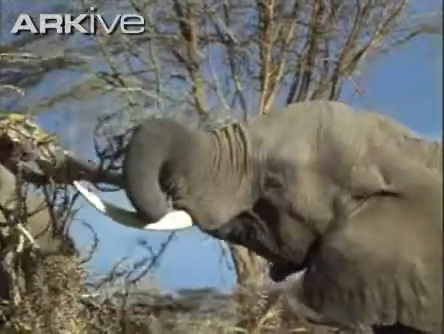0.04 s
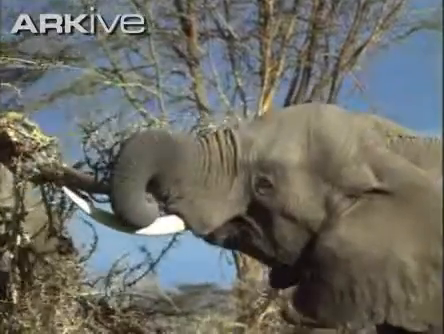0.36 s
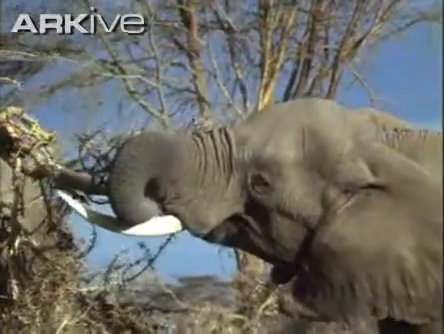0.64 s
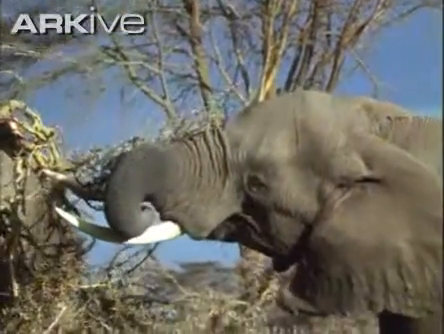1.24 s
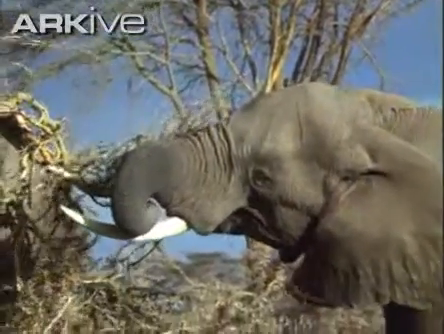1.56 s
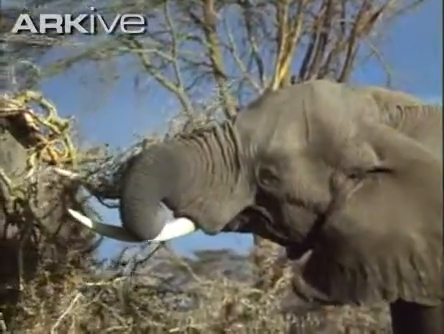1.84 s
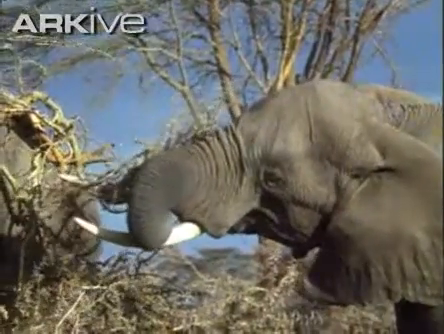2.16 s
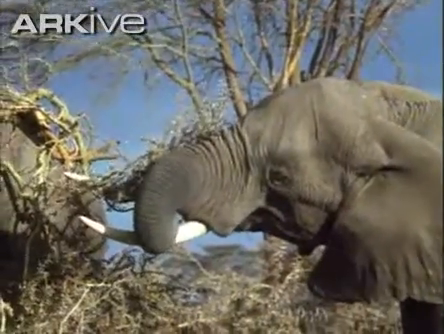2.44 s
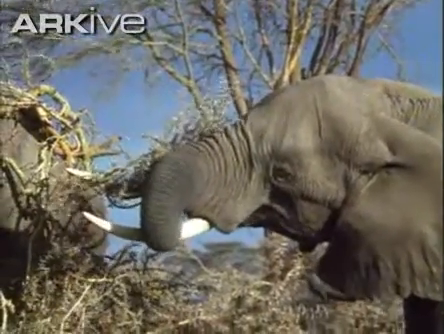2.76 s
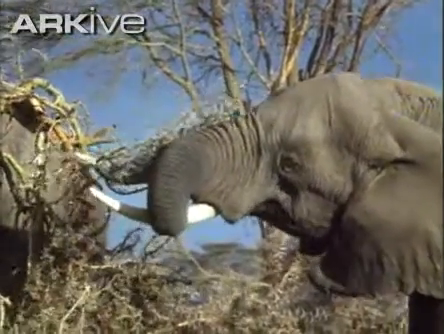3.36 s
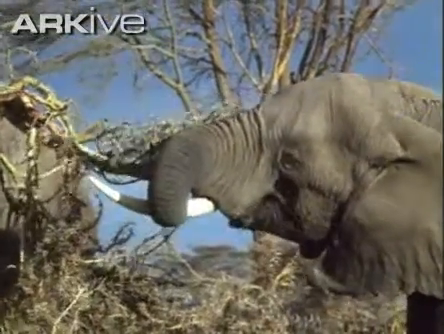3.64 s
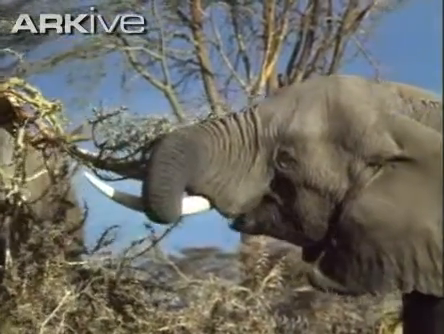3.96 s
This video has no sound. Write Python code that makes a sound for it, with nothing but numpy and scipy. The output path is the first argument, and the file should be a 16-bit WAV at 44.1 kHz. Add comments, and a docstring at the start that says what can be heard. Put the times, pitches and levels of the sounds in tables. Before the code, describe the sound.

Dry branches snapping and rustling as an elephant pulls at a tree, with bird trills.

```python
"""Open bush, a stereo microphone facing a dry thorn tree that an elephant is pulling at. From the start the
foliage rustles, limbs knock, green wood splinters and twigs snap, loudest just before one second. Then a
small bird off to the left gives the first of four trills, scattered by the trees, and a gust rumbles on
the microphone as more twigs go. A thick limb gives way at 2.3 s; a few last snaps follow. Far away, other
birds or insects chirr on and off and the air hums steadily to the end."""
import sys
import numpy as np
from scipy import signal
from scipy.fft import rfft, irfft, next_fast_len
from scipy.io import wavfile
from scipy.ndimage import map_coordinates

SR = 44100
rng = np.random.default_rng(int(sys.argv[2]) if len(sys.argv) > 2 else 0)


def to_wav(s):
    """Save 16-bit WAV."""
    ch = np.atleast_2d(s).T  # columns
    pcm = np.round(np.clip(ch, -1, 1) * 32767)  # PCM
    wavfile.write(sys.argv[1], SR, pcm.astype(np.int16))


N = 4 * SR


def amp(db):
    """Decibels to gain."""
    return 10 ** (np.asarray(db) / 20)


def unit(x):
    """Scale to rms 1."""
    return x / np.sqrt(np.mean(x ** 2) + 1e-20)


def along(points, hz):
    """Read (Hz, value) points on a log axis."""
    freqs, values = np.transpose(points)
    return np.interp(np.log(hz + 1), np.log(freqs + 1), values)


def curve(rows):
    """Read (seconds, value) points at every sample."""
    return np.interp(np.arange(N) / SR, *np.transpose(rows))


def wobble(rate):
    """A smooth random curve, rate knots a second."""
    knots = rng.standard_normal(int(N * rate / SR) + 4)
    return map_coordinates(knots, [np.arange(N) * rate / SR])


def filtered(x, response):
    """Multiply the spectrum of x by a response of frequency."""
    n = x.shape[-1]
    padded = next_fast_len(n + 8192)
    return irfft(rfft(x, padded) * response(np.fft.rfftfreq(padded, 1 / SR)), padded)[..., :n]


def resonate(x, hz, width):
    """One resonance; width is a share of its frequency."""
    return filtered(x, lambda f: 1j * f * hz * width / (hz * hz - f * f + 1j * f * hz * width))


def add(track, start, sound):
    """Mix a sound into the track, start in seconds."""
    i = max(round(start * SR), 0)
    track[i:i + len(sound)] += sound[:max(N - i, 0)]


def pan(left_db):
    """Gains of the two channels, the left louder by left_db."""
    return amp(np.array([[1], [-1]]) * left_db / 2)


def spread(pair, spectrum, coherence):
    """Colour two unrelated signals and blend them into stereo of rms 1."""
    def mid_side_gains(f):
        angle = np.arccos(np.clip(along(coherence, f), -1, 1)) / 2
        return amp(along(spectrum, f)) * [np.cos(angle), np.sin(angle)]
    mid, side = filtered(pair, mid_side_gains)
    return unit(np.array([mid + side, mid - side]))


def fibres(shape, rate, scatter_db):
    """Tiny fractures of uneven size at random moments, about rate a second, rms 1."""
    size = amp(scatter_db * np.minimum(rng.standard_exponential(shape), 5))
    breaks = rng.random(shape) < rate / SR
    return unit(breaks * np.sign(rng.standard_normal(shape)) * size)


# Twigs breaking straight ahead. Each row: start in seconds, relative level in dB, ring pitch in Hz,
# relative ring level in dB, ring t60 in seconds, crackle t60 in seconds, woody body boost in dB.
TWIG_SNAPS = [(0.034, -25, 5800, 0, .003, 0.009, 2), (0.303, -33.5, 5600, 14, .003, 0.0066, 0),
              (0.401, -27, 5040, 3.5, 0.0028, 0.01, 0), (0.6335, -22.5, 4730, -2, 0.0034, 0.006, -2),
              (0.6406, -24, 2600, 3, .003, 0.0099, -4), (0.6885, -15.5, 5760, 7, .003, 0.013, 1),
              (0.7456, -10, 5860, -0.5, 0.0027, 0.012, -1.5), (0.7867, -27.5, 2200, 0, .006, 0.0099, -5),
              (0.796, -24, 3100, -1, .003, 0.005, 4), (0.803, -26, 5600, 3, .003, 0.0081, 0),
              (0.812, -28.5, 4200, 4, .003, 0.009, -6), (0.8877, -21.5, 4930, -5, .003, 0.015, 3),
              (0.9507, -29, 5530, 9, .003, 0.009, 0), (1.012, -17.5, 3730, 10, .0019, 0.0053, -1),
              (1.419, -38, 3860, 22, .04, 0.012, -1), (1.5383, -26.5, 4620, 10, .003, 0.011, -1),
              (1.5476, -15.5, 5630, 4, .003, 0.009, 2), (1.5578, -16.5, 5600, 6, 0.0023, 0.0089, -4),
              (1.571, -27, 2030, -4, 0.0033, 0.009, 0), (1.5777, -28, 4750, -1, .003, 0.009, 0),
              (1.6051, -15.5, 5430, 1.5, 0.0032, 0.0087, 1), (1.633, -29.5, 2530, 7, .005, 0.011, 4),
              (1.6436, -16, 2400, -3, 0.0025, 0.013, -4.5), (2.132, -35, 2100, 16, .025, 0.012, 0),
              (2.974, -24.5, 7360, -1, .003, 0.009, 6), (2.9924, -16.5, 3590, 13.5, 0.011, 0.0067, 6.5),
              (3.4882, -31.5, 6060, 12, .003, 0.008, 0), (3.8399, -31.5, 5730, -5, .003, 0.0061, -3),
              (3.8565, -14, 5100, 9.5, 0.0034, 0.005, 2), (3.871, -30, 4400, 1, .003, 0.009, 2),
              (3.9705, -26, 1900, 10.5, .004, 0.018, -2)]
# The break crossing a twig. Each row: nominal delay in seconds, signed share of the impulse.
FRACTURE_STEPS = [(0, 0.28), (.0004, -0.44), (.0009, 0.2)]
# The colour of a dry crack. Each row: frequency in Hz, gain in dB.
CRACK_SPECTRUM = [(100, -31), (600, -1), (1100, -1.5), (1700, 4.5), (3500, 4.5), (5500, 4.5), (7500, 3)]
# Where a thicker twig adds body. Each row: frequency in Hz, share of the boost.
BODY_SHARE = [(900, 0.93), (1700, 0.63), (2800, 0)]

def twig_snaps():
    """A twig parts in a few quick steps, rings and sheds a crackle of fibres, then shivers."""
    out, t = np.zeros(N), np.arange(SR // 8) / SR
    shiver = amp(-22 - 60 * t / 0.055)
    for start, db, hz, ring_db, ring_t60, crackle_t60, body_db in TWIG_SNAPS:
        crackle = amp(-15 - 60 * (t / crackle_t60) ** 2)
        crack = fibres(len(t), rate=20000, scatter_db=2) * (crackle + shiver)
        pace = rng.uniform(0.6, 1.3)
        for delay, share in FRACTURE_STEPS:
            crack[round(delay * pace * SR)] = amp(10.5) * share
        crack = np.pad(crack, (SR // 1000, 0))  # room for the filter to ring ahead of the break
        wood = filtered(crack, lambda f: amp(along(CRACK_SPECTRUM, f) + body_db * along(BODY_SHARE, f)))
        ring = resonate(crack, hz, width=np.log(1000) / (np.pi * ring_t60 * hz))
        add(out, start + 0.00026, amp(db - 1.5) * (wood + amp(ring_db + 2.5) * ring))
    return out


# Green wood tearing, ahead and to the left. Each row: start in seconds, relative level in dB,
# centre in Hz, left over right in dB, seconds to fall by 12 dB.
SPLINTERS = [(0.155, -35, 1780, 3.5, 0.02), (0.524, -32, 4700, 2, 0.013), (0.7874, -27.5, 2040, 1, 0.029),
             (0.934, -32.5, 2570, 5.5, 0.012), (1.0072, -26, 3400, -0.5, 0.012),
             (1.0644, -37.5, 3720, 15.5, 0.04), (1.1137, -33.5, 2120, 15.5, 0.013),
             (2.0635, -30.5, 4300, -2, 0.012), (2.664, -32.5, 2300, 3, 0.016),
             (3.9804, -30.5, 2530, -1, 0.021)]

def splintering():
    """Tougher wood tears in a short run of fractures that dies away."""
    out, t = np.zeros((2, N)), np.arange(SR // 4) / SR
    attack = 1 - np.exp(-t / 0.00053)
    for start, db, hz, left_db, fall_s in SPLINTERS:
        tear = unit(resonate(fibres(len(t), rate=4000, scatter_db=2.5), hz, width=0.34))
        envelope = attack * amp(db - 9 - 12 * t / fall_s)
        for channel, gain in zip(out, pan(left_db)):
            add(channel, start, gain * envelope * tear)
    return out


# The hollow notes of a thick limb, dead ahead. Each row: pitch in Hz, level in dB, t60 in seconds.
THUMP_MODES = [(354, -27.5, 0.064), (420, -24.5, 0.041), (500, -28, 0.047)]
# The colour of its tearing fibres. Each row: frequency in Hz, gain in dB.
TEAR_SPECTRUM = [(300, -13), (900, -19), (1400, -7), (2150, 2.5), (2850, 1), (3500, -7), (4200, 3),
                 (5200, -2), (7500, -7.5)]

def limb_break():
    """A thick limb gives way: a dull crack, a hollow thump, then its fibres tear and peel apart."""
    out, t = np.zeros(N), np.arange(SR // 4) / SR
    start = 2.301
    crack_t60, tear_t60, peel_t60 = 0.037, 0.042, 0.25  # seconds
    crack = unit(resonate(fibres(len(t), rate=13000, scatter_db=2.5), hz=1090, width=1.8))
    add(out, start, amp(-31 - 60 * t / crack_t60) * crack)
    thump = sum(amp(db - 60 * t / t60) * np.sin(2 * np.pi * hz * t) for hz, db, t60 in THUMP_MODES)
    add(out, start + 0.0029, (1 - np.exp(-t / 0.0028)) * thump)
    fractures = fibres(len(t), rate=11000, scatter_db=2)
    tear = unit(filtered(fractures, lambda f: amp(along(TEAR_SPECTRUM, f))))
    fade = amp(-30 - 60 * t / tear_t60) + amp(-37 - 60 * t / peel_t60)
    add(out, start + 0.008, fade * tear)
    return out


# Limbs meeting inside the tree. Each row: start in seconds, relative level in dB, pitch in Hz,
# t60 in seconds.
LIMB_KNOCKS = [(0.152, -39, 468, 0.11), (0.74, -38, 268, 0.09), (0.933, -33.5, 290, 0.079),
               (1.488, -35.5, 743, 0.067), (1.924, -33, 300, 0.022), (1.93, -31, 155, 0.048),
               (2.01, -33, 467, 0.037), (2.211, -40, 520, 0.056), (2.712, -35, 1160, 0.042),
               (3.942, -33, 726, 0.029), (3.986, -32, 528, 0.044)]

def limb_knocks():
    """Limbs bump and judder: a damped low note under a rough wooden scuff."""
    out, t = np.zeros(N), np.arange(SR // 4) / SR
    attack = 1 - np.exp(-t / 0.003)
    for start, db, hz, t60 in LIMB_KNOCKS:
        scuff = unit(resonate(fibres(len(t), rate=3800, scatter_db=-0.5), hz, width=0.93))
        bark = unit(resonate(fibres(len(t), rate=3000, scatter_db=-3.5), hz=750, width=1.2))
        body = 0.65 * np.sin(2 * np.pi * hz * t) + 0.51 * scuff + 0.23 * bark
        add(out, start + 0.0014, amp(db + 4 - 60 * t / t60) * attack * body)
    return out


# How hard the foliage is dragged. Each row: time in seconds, relative level in dB.
DRAG_LEVEL = [(0, -45.5), (.16, -43.5), (.47, -47.5), (.62, -45), (.82, -40.5), (.95, -43), (1.1, -44),
              (1.16, -50.5), (1.25, -40.5), (1.33, -48), (1.45, -50.5), (1.5, -47), (1.57, -46.5),
              (1.7, -47.5), (2.1, -45), (2.28, -41), (2.47, -41), (2.77, -46.5), (2.93, -47), (3.06, -45.5),
              (3.25, -52), (3.45, -53), (3.7, -49), (3.9, -51.5), (4, -47.5)]
# The colour of dry leaves. Each row: frequency in Hz, gain in dB.
LEAF_SPECTRUM = [(150, -10), (400, -14.5), (800, -2), (1200, -8), (2000, -4.5), (3200, -4.5), (5000, -2.5),
                 (6500, -5), (7500, -4.5)]
# The leaves sit near the centre. Each row: frequency in Hz, left-right coherence.
LEAF_COHERENCE = [(200, 0.96), (1000, 0.54), (2000, 1), (7000, 0.97)]
# Twigs rubbing together. Each row: resonance in Hz, level against the leaves in dB.
TWIG_SCRAPES = [(720, -19), (1950, -11), (3700, -13), (4900, -21.5)]

def foliage_rustle():
    """Dry leaves and thorns brush past each other: dense hiss, sparser ticks and fits of scraping."""
    hiss = fibres((2, N), rate=12000, scatter_db=2.5)
    ticks = amp(-12) * fibres((2, N), rate=350, scatter_db=5.5)
    flutter = amp(2.6 * np.tanh(wobble(32.02)))
    leaves = flutter * spread(hiss + ticks, LEAF_SPECTRUM, LEAF_COHERENCE)
    scrapes = np.zeros(N)
    for hz, db in TWIG_SCRAPES:
        fits = amp(2.3 * wobble(28.17))
        rubbing = resonate(fibres(N, rate=3000, scatter_db=2), hz, width=0.39)
        scrapes += amp(db) * unit(fits * rubbing)
    return amp(curve(DRAG_LEVEL) + 3) * (leaves + scrapes)


def echoes(x, t60):
    """Vegetation scatters a sound into a diffuse stereo tail, each band dying at its own rate."""
    hz, t, noise = signal.stft(rng.standard_normal((2, SR // 2)), SR, nperseg=256)
    decay = amp(-60 * t / along(t60, hz)[:, None])
    tail = signal.istft(noise * decay, SR, nperseg=256)[1]
    return signal.fftconvolve(x[None], tail / np.linalg.norm(tail[0]), axes=1)[:, :N]


# The short decay of the bush around the tree. Each row: frequency in Hz, t60 in seconds.
BUSH_DECAY = [(200, 0.19), (2000, .13), (7000, 0.035)]

def bush_scatter(wood):
    """The bush throws a faint echo of the breaking wood back to the microphone."""
    return amp(-27) * echoes(wood.mean(axis=0), BUSH_DECAY)


# A small bird left of the microphone. Each row: start in seconds, relative level in dB, time stretch,
# loss behind bushes on the direct path in dB.
BIRD_TRILLS = [(1.119, -31.5, 1.02, 0.5), (1.916, -33, 1.03, 22), (2.325, -32.5, 1.03, -0.5),
               (3.4081, -34, 0.99, -1)]
# Its song lingering among the trees. Each row: frequency in Hz, t60 in seconds.
TREE_DECAY = [(2000, .6), (7000, 0.48)]

def bird_trills():
    """Each trill is a run of steep downward chirps that swells, slows to a steady beat and eases off."""
    chirp_s, top_hz, end_hz = 0.014, 6483, 4990
    swell_s, fade_s, left_lead_s = 0.036, 0.017, 38e-6
    song, direct = np.zeros(N), np.zeros(N)
    progress = np.arange(int(chirp_s * SR)) / SR / chirp_s
    envelope = np.interp(progress, [0, 0.25, 0.55, 1], [0, 0.79, 0.5, 0.071])
    phase = 2 * np.pi * np.cumsum(top_hz + (end_hz - top_hz) * progress) / SR
    gaps = np.minimum(0.0143 + 0.00105 * np.arange(13), 0.0212)
    for start, db, stretch, hidden_db in BIRD_TRILLS:
        for at in np.append(0, np.cumsum(gaps)):
            arch_db = -8.5 * np.exp(-at / swell_s) - 0.5 * np.exp((at - gaps.sum()) / fade_s)
            gain = amp(db + arch_db + rng.normal(0, 0.57))
            chirp = gain * envelope * np.sin(phase * rng.normal(1, 0.0039))
            add(song, start + stretch * at, chirp)
            add(direct, start + stretch * at, amp(-hidden_db) * chirp)
    at_microphone = filtered(direct, lambda f: np.exp(1j * np.pi * f * [[1], [-1]] * left_lead_s))
    return pan(left_db=3) * (at_microphone + amp(-5) * echoes(song, TREE_DECAY))


# Chirring from far out in the bush. Each row: time in seconds, level in dB.
CHIRR_LEVEL = [(0, -44), (.15, -67), (.45, -52.5), (.7, -68.5), (3.3, -63), (3.88, -57), (4, -50)]

def far_chirring():
    """Distant birds or insects blur into a faint, wide high band that comes and goes."""
    spectrum = [(4300, -62.5), (5100, -8), (5950, 8), (6350, -7), (6900, -60)]  # Hz, dB
    band = spread(rng.standard_normal((2, N)), spectrum, coherence=[(6000, -0.6)])
    return amp(curve(CHIRR_LEVEL) + wobble(10)) * pan(left_db=1.7) * band


# A light wind on the microphone, with one gust. Each row: time in seconds, level in dB.
WIND_LEVEL = [(0, -45), (.4, -52), (1.33, -46.5), (1.45, -37), (1.6, -40), (1.75, -49), (3.2, -53.5),
              (4, -50)]
# The colour of its rumble. Each row: frequency in Hz, gain in dB.
WIND_SPECTRUM = [(8, -0.5), (17, -6.5), (35, -12.5), (60, -23.5), (120, -40.5), (300, -71)]

def microphone_wind():
    """Slow eddies press on each side of the microphone almost independently."""
    eddies = amp(curve(WIND_LEVEL) + 0.98 * wobble(9.8))
    rumble = spread(rng.standard_normal((2, N)), WIND_SPECTRUM, coherence=[(30, 0.064)])
    return eddies * pan(left_db=2.7) * rumble


# The colour of the distant air. Each row: frequency in Hz, gain in dB.
AIR_SPECTRUM = [(25, 2.5), (45, 4), (100, -5), (180, -2), (330, -1), (600, -3.5), (1200, -9), (2000, -13),
                (4000, -24.5), (7500, -19)]
# Its width at the microphone. Each row: frequency in Hz, left-right coherence.
AIR_COHERENCE = [(60, .2), (200, 0.46), (900, 0.38), (2000, .7), (7000, 0.14)]
# Its lean to one side. Each row: frequency in Hz, left over right in dB.
AIR_BALANCE = [(40, 6), (100, 4.5), (200, 2.5), (600, 1.5), (2000, 0), (7000, 0)]

def distant_air():
    """The steady far-off hum of open country, its bass leaning left."""
    hum = spread(rng.standard_normal((2, N)), AIR_SPECTRUM, AIR_COHERENCE)
    return amp(-47 + 0.32 * wobble(4)) * filtered(hum, lambda f: pan(along(AIR_BALANCE, f)))


def scene():
    """The tree stands straight ahead of the microphone; birds, air and wind surround it."""
    wood = twig_snaps() + splintering() + limb_knocks() + limb_break()
    tree = wood + bush_scatter(wood) + foliage_rustle()
    return tree + bird_trills() + far_chirring() + distant_air() + microphone_wind()


def record(dry):
    """The recorder cuts off steeply above its band limit."""
    top_hz, db_per_hz = 7590, 0.12
    return filtered(dry, lambda f: amp(-np.clip((f - top_hz) * db_per_hz, 0, 100)))


dry = scene()
out = record(dry)
to_wav(out)
```